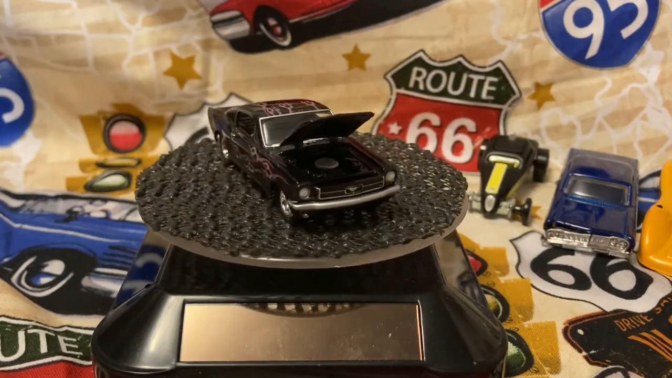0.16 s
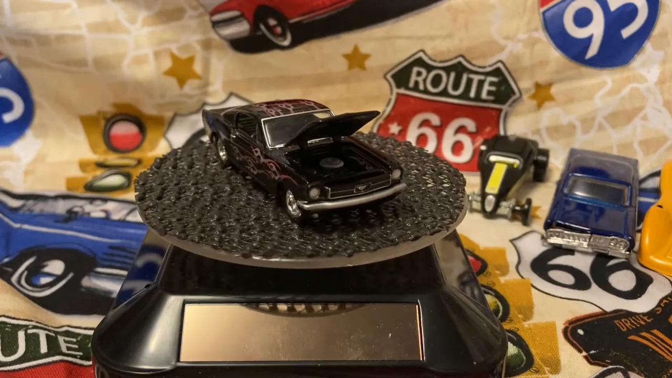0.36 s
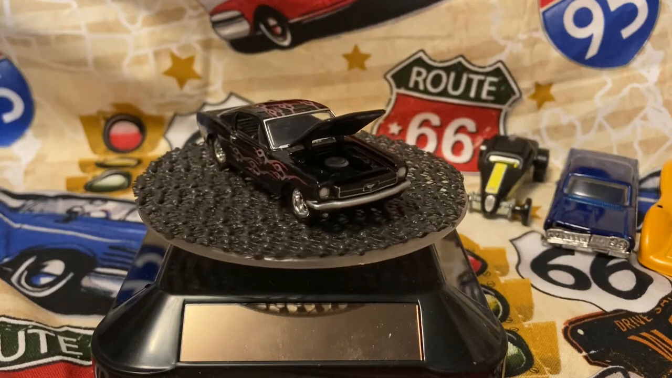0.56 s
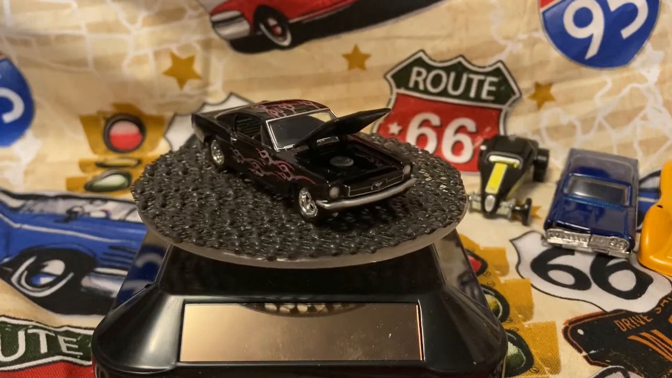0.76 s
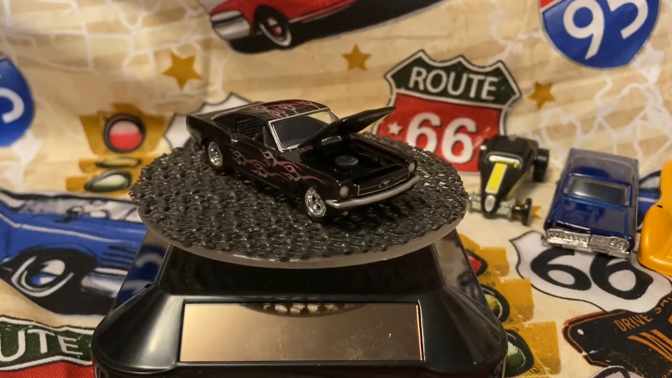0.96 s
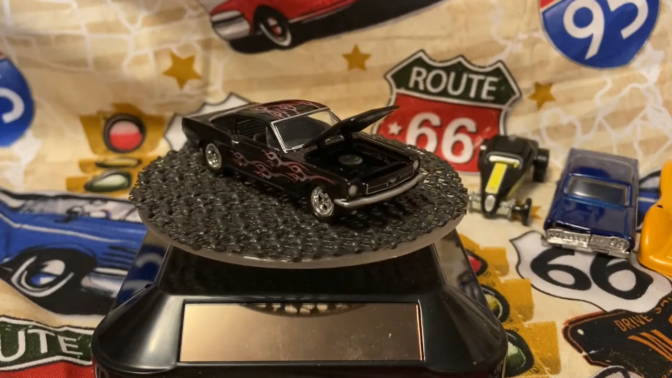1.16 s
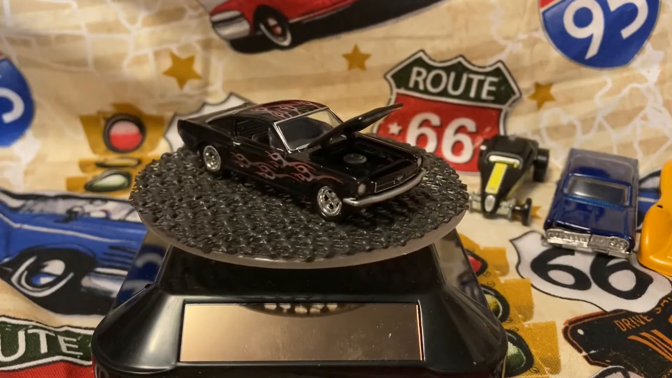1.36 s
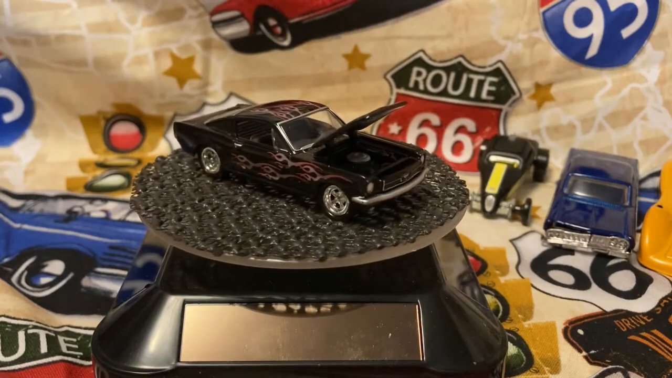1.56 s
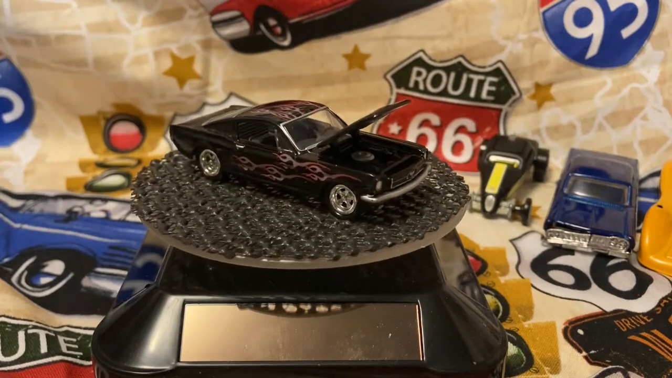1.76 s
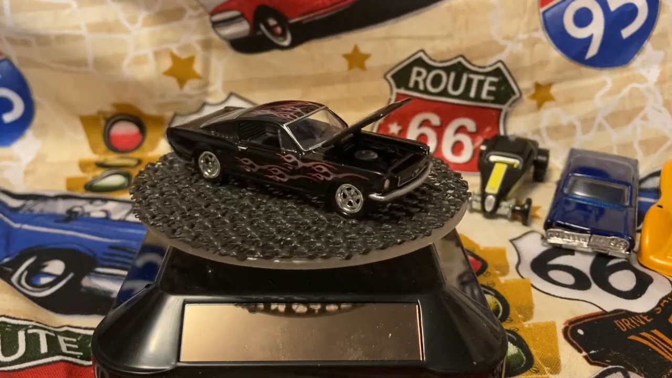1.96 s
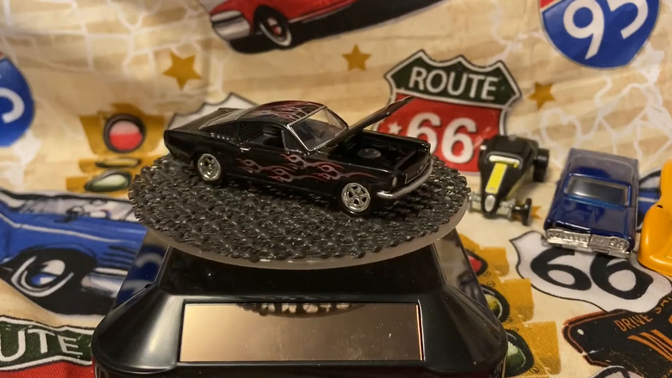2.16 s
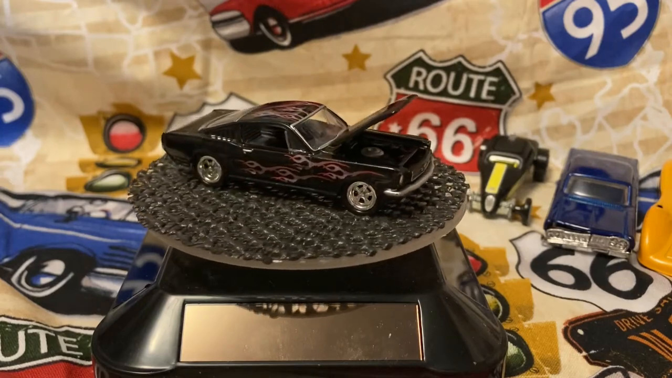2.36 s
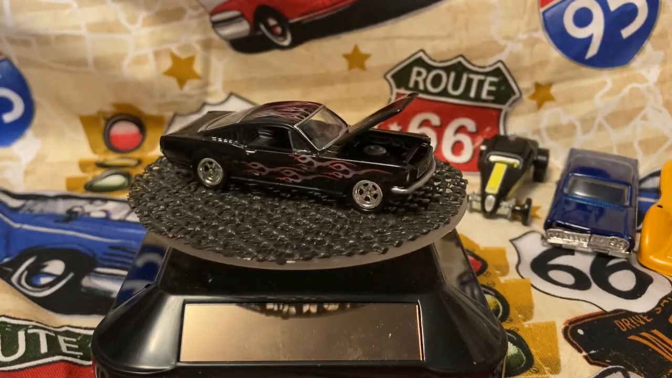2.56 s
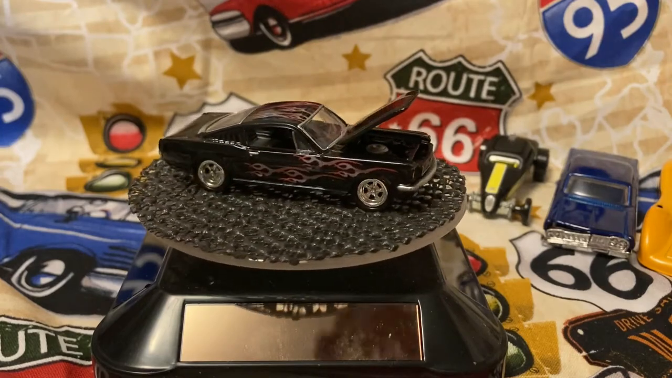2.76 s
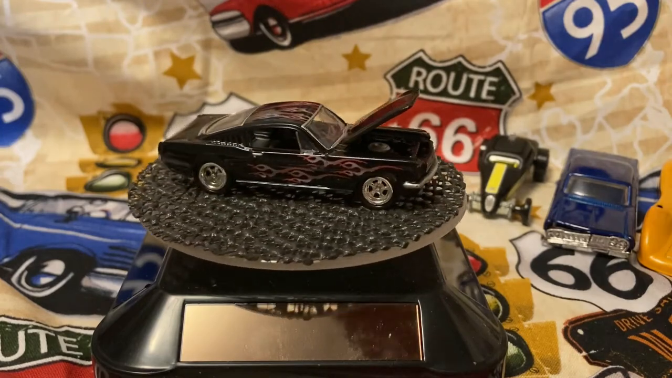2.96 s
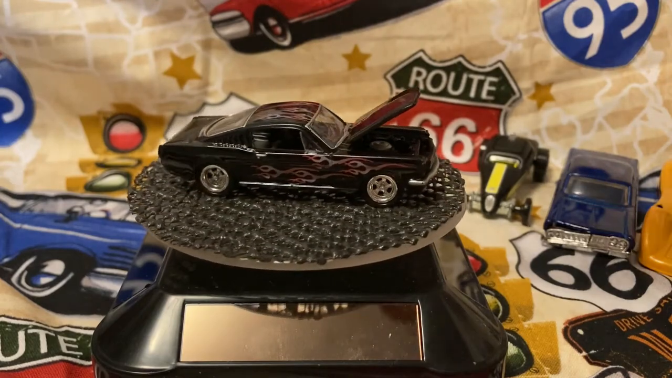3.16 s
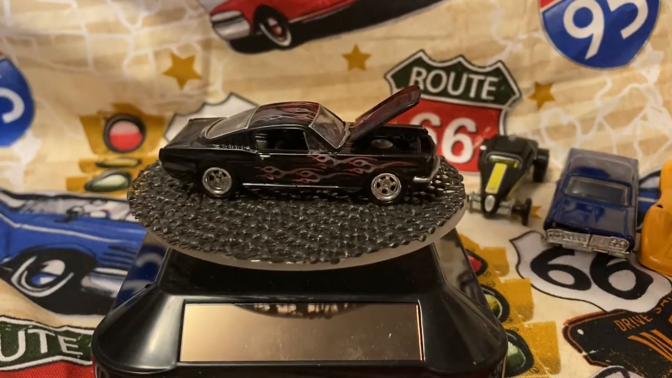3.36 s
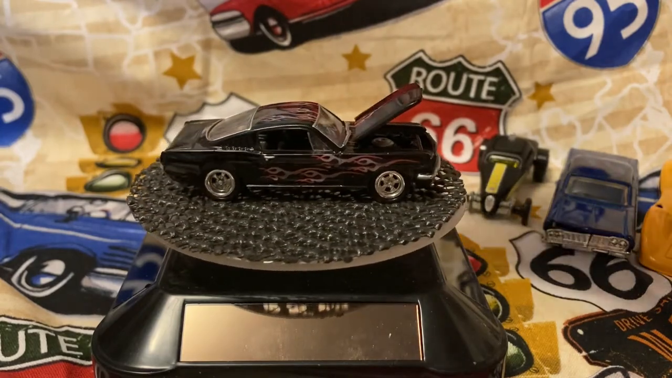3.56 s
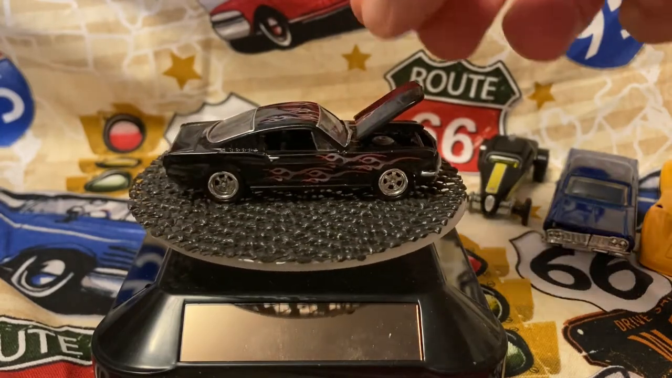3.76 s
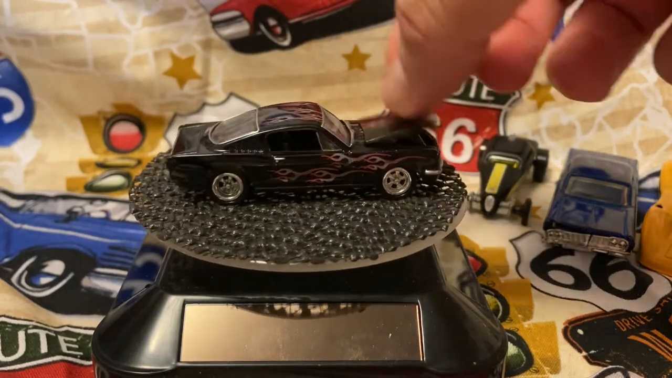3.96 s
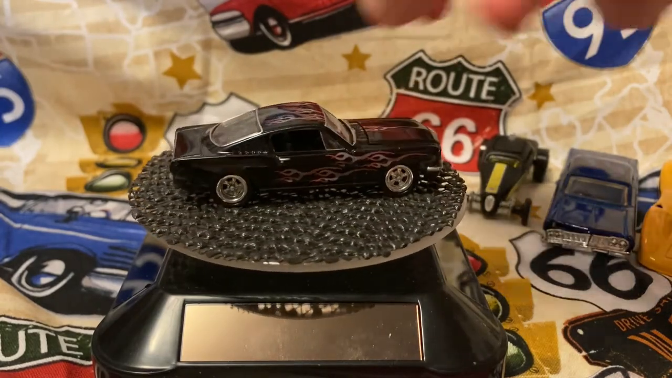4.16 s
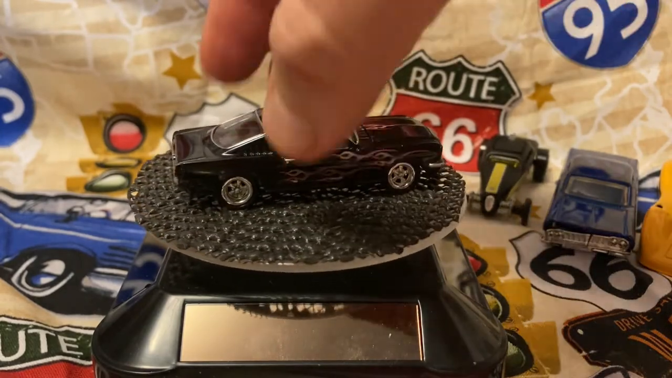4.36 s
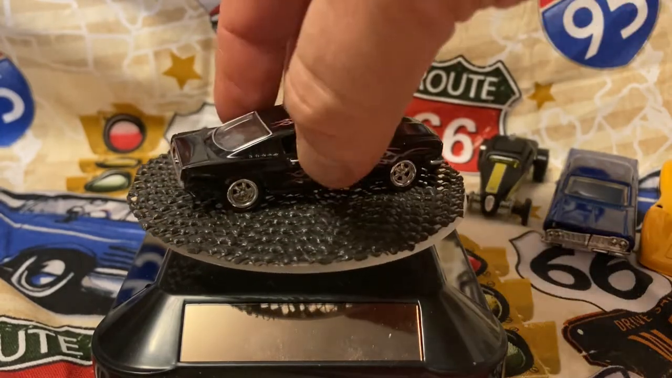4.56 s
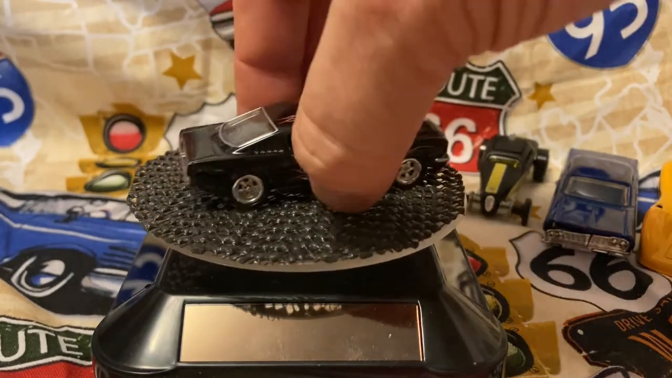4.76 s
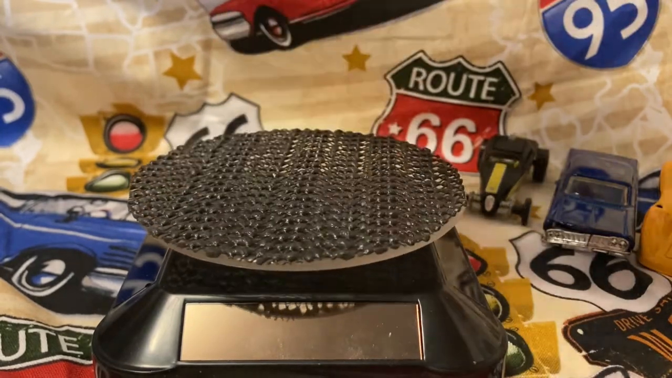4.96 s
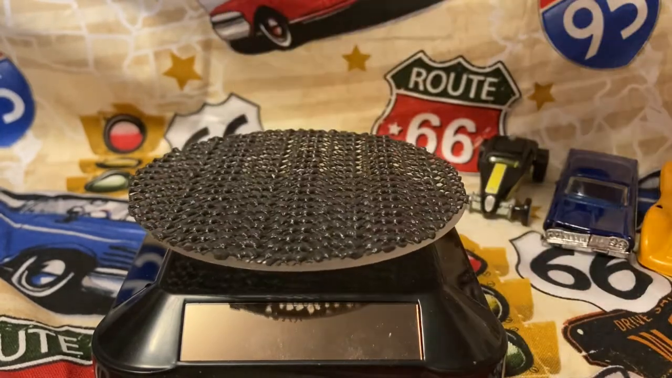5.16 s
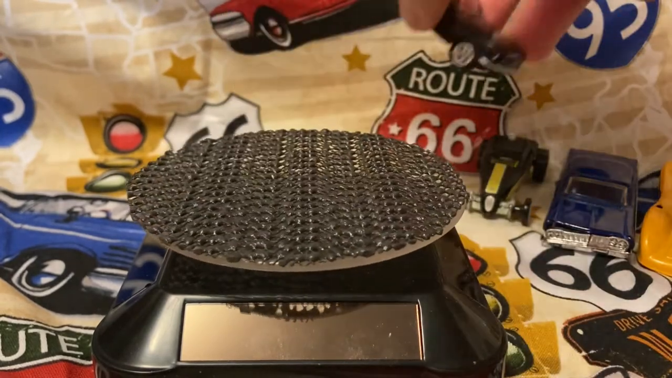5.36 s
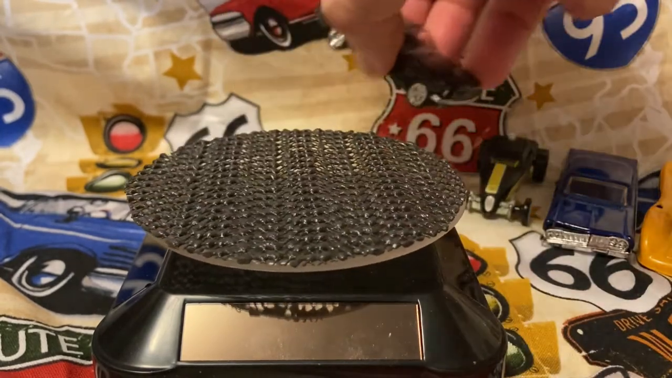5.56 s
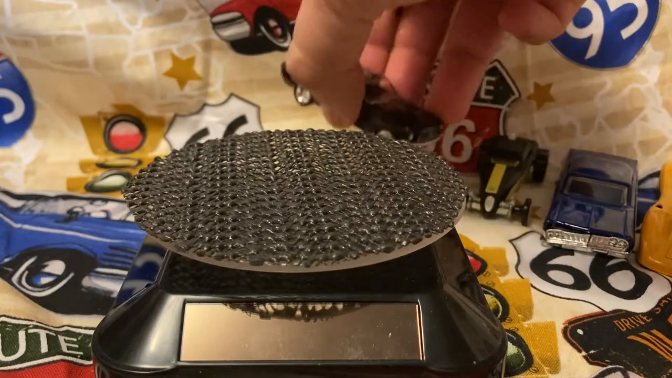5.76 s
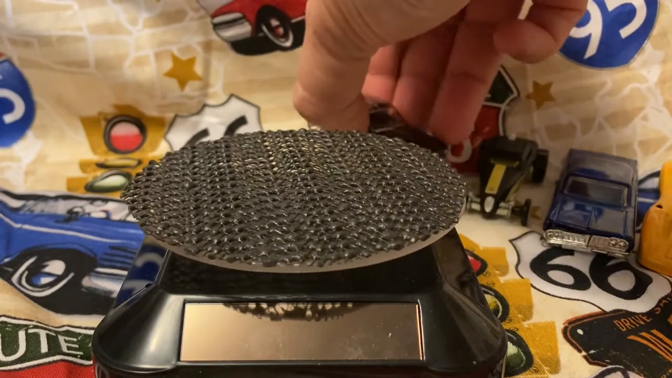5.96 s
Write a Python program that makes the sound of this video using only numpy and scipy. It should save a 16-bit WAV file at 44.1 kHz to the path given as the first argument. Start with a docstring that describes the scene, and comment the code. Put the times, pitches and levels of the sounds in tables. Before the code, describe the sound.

A low furnace blower hums and rumbles indoors; a tiny metal hood snaps shut with a sharp click, then the toy car is lifted away.

```python
"""A belt-driven furnace blower hums, rumbles and hisses while a die-cast toy car turns on a rubbing platter.
Resonant noise bursts make light knocks; near 1.9 s faint clicks ring metal modes, near 3.4 s a woody tick.
At 4.02 s a finger snaps the hood shut: one sharp modal click and a rebound. From 4.6 s the hand grips the
car and lifts it off: granular skin rubs, stick-slip tyres, rattling wheels and a hiss of cloth.
A short noise tail adds the room; a phone with two microphones stands close to the toy."""
import sys
import numpy as np
from scipy import signal
from scipy.fft import rfft, irfft
from scipy.io import wavfile
from scipy.ndimage import uniform_filter1d

SR = 44100
rng = np.random.default_rng(int(sys.argv[2]) if len(sys.argv) > 2 else 0)


def master_out(mix):
    """Clip the mix to full scale and print it as 16-bit PCM to the path in sys.argv[1]."""
    frames = np.transpose(np.atleast_2d(mix))
    ceiling = np.clip(frames, -1, 1)
    pcm = np.round(ceiling * 32767).astype(np.int16)
    wavfile.write(sys.argv[1], SR, pcm)


N = 265329
TIME = np.arange(N) / SR
FREQ = np.maximum(np.arange(N // 2 + 1) * SR / N, 1)
TOP_HZ = 16300


def undb(db):
    """Logarithmic level: decibels to amplitude gain."""
    return 10 ** (np.asarray(db) / 20)


def level(x, db):
    """Normalisation: divide by the overall rms, then apply a level in dB, fixed or changing in time."""
    return x * undb(db) / np.sqrt(np.mean(x ** 2))


def curve(rows):
    """Linear interpolation of (t/s, value) rows over time."""
    return np.interp(TIME, *np.transpose(rows))


def spectrum(rows, hz=FREQ):
    """Interpolation of (f/Hz, value) rows on a logarithmic frequency axis."""
    points, values = np.transpose(rows)
    return np.interp(np.log(hz), np.log(points), values)


def shape(x, gain):
    """Linear filtering: multiply the spectrum by a gain at each frequency."""
    return irfft(rfft(x, N) * gain, N)


def resonance(hz, width_hz, at=FREQ):
    """Frequency response of one damped resonator, 1 at its centre."""
    return 1 / (1 + 1j * (at ** 2 - hz ** 2) / (at * width_hz))


def pan(db):
    """Interaural level difference: left and right gains for left minus right in dB."""
    return undb(np.array([[1], [-1]]) * db / 2)


def tilt(db, hz):
    """Spectral slope in dB per 10 kHz, level above the top frequency."""
    return undb(db * np.minimum(hz, TOP_HZ) / 1e4)


def ripple(depth_db, spacing_hz):
    """Multipath interference: sound paths that add and cancel give each microphone an uneven response."""
    points = np.arange(0, SR, max(spacing_hz, 5))
    sides = rng.standard_normal((len(points), 2)).T
    return undb(depth_db * np.array([np.interp(FREQ, points, side) for side in sides]))


def diffuse(hz):
    """Diffuse-field coherence: random spectra whose correlation at two microphones depends on frequency."""
    # likeness of the two microphones in the room's sound: f/Hz, correlation
    coherence = [(60, 1), (170, 0.97), (270, 0.99), (400, 0.282), (550, 0.34), (820, -0.51), (1050, 0.6),
                 (1450, 0.3), (2400, 0.017), (3500, -.3), (5000, -0.027), (15000, -0.21)]
    # balance of the two microphones: f/Hz, left minus right/dB
    balance = [(100, -0.7), (190, 0), (290, -6.5), (420, -0.5), (540, 3), (700, -1.5), (1000, 0.5),
               (1700, -1.5), (2100, -2), (3600, 0.5), (5000, 0)]
    mid, side = np.exp(2j * np.pi * rng.random((2, len(hz))))
    alike = np.clip(spectrum(coherence, hz), -1, 1)
    common = mid * np.sqrt(1 + alike)
    opposed = side * np.sqrt(1 - alike) * np.array([[1], [-1]])
    return (common + opposed) * pan(spectrum(balance, hz))


def walk(rate):
    """Band-limited random modulation: smoothed random steps, rate per second, with an rms near 1."""
    size = int(SR / rate)
    steps = np.repeat(rng.standard_normal(N // size + 1), size)
    smooth = uniform_filter1d(uniform_filter1d(steps, size), size)
    return level(smooth[:N], 0)


def flutter(x, depth_db, rate, count=7):
    """Independent amplitude modulation: each half octave from 700 Hz up flickers on its own."""
    place = np.clip(2 * np.log2(FREQ / 700), 0, count - 1)
    bands = rfft(x)
    out = 0
    for k in range(count):
        band = irfft(bands * np.maximum(1 - abs(place - k), 0), N)
        out = out + band * undb(depth_db * walk(rate))
    return out


def add(out, start, sound):
    """Superposition: mix a short sound in at a time."""
    first = int(start * SR)
    out[:, first:first + sound.shape[1]] += sound[:, :N - first]


def fade(t, t60, rise):
    """Damped envelope: a quick rise and an exponential decay of 60 dB in t60."""
    return (1 - np.exp(-t / rise)) * undb(-60 * t / t60)


def ring(modes, rise, size=8192):
    """Modal superposition: the decaying modes (f/Hz, rms level before decay/dB, t60/s) of a struck object."""
    t = TIME[:size]
    hz, mode_db, t60 = np.transpose(modes)[:, :, None]
    phase = 2 * np.pi * (hz * t + rng.random((len(modes), 1)))
    return np.sum(np.sqrt(2) * undb(mode_db) * np.sin(phase) * fade(t, t60, rise), axis=0)


def stroke(start, length):
    """Envelope of sliding friction: attack, hold and exponential release of a rub."""
    attack_s, release_t60_s = 0.0044, 0.26
    attack = np.clip((TIME - start) / attack_s, 0, 1)
    return attack * np.exp(-np.log(1000) * np.maximum(TIME - start - length, 0) / release_t60_s)


def motor(waver_db=1.76, wander_per_100_hz=0.12):
    """Tonal radiation: steady tones waver a little in level and phase on their way through the house."""
    # strong tones of motor, mains and blower:
    # f/Hz, mean rms level/dB, left minus right/dB, left phase lead/rad
    tones = [(50.2, -47.5, 0, 0.12), (58.92, -41.5, 0.9, 0.09), (64.5, -56.5, -1.5, 0),
             (71, -54.5, -1, 0.4), (81.26, -56, 1, 0.77), (119.5, -49.5, 1.04, -0.28),
             (135.9, -56.5, -1, 0.13), (163.64, -52.5, -1.5, -0.17), (168.4, -59, 0.5, 0.4),
             (201.7, -60.5, 3, 0.2), (207, -56, -1.5, 0.3), (213.6, -58.5, -0.5, 0.57),
             (217.8, -59, -0.5, 0.5), (244.4, -62, -5.5, -0.25), (273.8, -65.5, -1.5, 0.3),
             (289.1, -57, 0.5, 0), (358.9, -58, 0.5, 1.5), (374.5, -63, -7.5, 1.64), (384, -65, -6.5, 2.5),
             (470, -70, -2.5, 1.5), (593.4, -68.5, 5, 1.5)]
    out = 0
    for hz, db, lean_db, lead in tones:
        wander = wander_per_100_hz * hz / 100 * walk(2.997)  # rad
        phase = 2 * np.pi * (hz * TIME + rng.random()) + wander
        tone = np.sqrt(2) * np.sin(phase + np.array([[lead], [-lead]]) / 2)
        out = out + tone * undb(db + waver_db * walk(2.97)) * pan(lean_db)
    return out


def belt_loop(colour, slip):
    """Harmonic series of near-periodic motion: lines at the belt's turning rate; slip blurs the higher ones."""
    belt_hz = 5.449
    detune_hz = (FREQ + belt_hz / 2) % belt_hz - belt_hz / 2
    lines = np.exp(-.5 * (detune_hz / (slip * FREQ + 0.064)) ** 2)
    lines = lines / np.sqrt(slip * FREQ + 0.15)  # wider lines stand lower
    return irfft(diffuse(FREQ) * colour * lines * ripple(1.65, belt_hz), N)


def blower(duct_waver_db=2.5):
    """Forced vibration and flow noise: the belt shakes the casing and rings a duct under the rush of air."""
    # colour of the rumble that repeats with the belt: f/Hz, relative level/dB
    rumble_colour = [(25, -20.5), (45, 7), (65, 19), (105, 10), (165, 4.5), (260, 4.5), (320, 1.5),
                     (410, -23), (455, -8.5), (510, -14.5), (620, -8), (800, -24), (1200, -41.5)]
    # air rushing in the ducts: f/Hz, relative level per Hz/dB
    air_colour = [(20, -30), (32, -16), (40, -14), (55, -2.5), (72, -1), (120, -12), (160, -7),
                  (260, -12.5), (330, -21.5), (680, -25.5), (850, -30.5), (1080, -31), (1320, -35),
                  (1750, -33), (2100, -38.5), (2600, -40.5), (3800, -45.5), (4900, -46), (5500, -55),
                  (16000, -74)]
    # swelling of the duct resonance, before its quick throbs: t/s, level/dB
    duct_swell = [(0, -64.5), (2, -63.5), (3, -57), (4, -56.5), (5, -54), (6, -57)]
    duct_hz, duct_width_hz = 559.3, 23
    rumble_db, air_db = -49, -44.5  # rms

    rumble = belt_loop(undb(spectrum(rumble_colour)), slip=.0012)
    # three cascaded stages, each twice as wide, are together about as wide as the duct resonance
    duct = belt_loop(resonance(duct_hz, duct_width_hz * 2) ** 3, slip=0.0056)
    duct = duct * undb(duct_waver_db * walk(16))
    air = irfft(diffuse(FREQ) * undb(spectrum(air_colour)), N)
    # above the bass the airflow flutters, and the room colours it finely
    hiss = shape(air, FREQ ** 4 / (FREQ ** 4 + 650 ** 4))
    bass = air - hiss
    hiss = flutter(shape(hiss, ripple(2.57, 30)), depth_db=1.0, rate=28)
    air = bass + hiss * undb(0.62 * walk(22))
    return level(rumble, rumble_db) + level(duct, curve(duct_swell)) + level(air, air_db)


def turntable(grain_db=2.5):
    """Sliding friction: the slowly turning platter rubs in soft, high, gritty swishes."""
    # rubs of the platter, three or four a second: t of the peak/s, peak level/dB, length/s
    swishes = [(.145, -75.5, 0.13), (0.437, -80, 0.14), (.66, -82, .25), (0.867, -73.5, .11),
               (1.085, -80, .15), (1.35, -76, 0.11), (1.55, -76, .22), (1.762, -75.5, .07),
               (2.073, -71.5, .14), (2.222, -71.5, 0.16), (2.47, -71, 0.27), (2.69, -73.5, 0.14),
               (2.928, -74.5, .15), (3.37, -76, 0.22), (3.633, -73, 0.14), (3.92, -79.5, 0.45),
               (4.3, -77, .17), (5.009, -71, 0.051), (5.036, -70.5, 0.13), (5.47, -77, 0.17),
               (5.689, -74.5, 0.17), (5.997, -74, 0.16)]
    # their colour: f/Hz, relative level per Hz/dB
    swish_colour = [(3000, -24.5), (5500, -7), (7000, -6), (8200, 0.5), (9400, -19.5), (12000, -11),
                    (16000, -29)]
    # share of the length spent rising, dB below the peak at the ends, level of the steady rubbing
    attack_share, depth_db, steady_db = .3, 15.5, -88

    effort = undb(steady_db)
    for peak, db, length in swishes:
        before = (peak - TIME) / attack_share
        after = (TIME - peak) / (1 - attack_share)
        away = np.maximum(before, after) / length
        effort = np.maximum(effort, undb(db - depth_db * away))
    grains = rng.standard_normal((2, N)) * undb(grain_db * walk(350))
    return effort * level(shape(grains, undb(spectrum(swish_colour))), 0)


def knocks(rise_share=0.021):
    """Contact noise through one resonance: in softer contacts, the longer one lasts, the gentler it starts."""
    # light knocks and rubs of fingers, wheels and turntable:
    # t/s, rms level before decay/dB, resonance f/Hz, width of each of two stages/Hz, t60/s, left minus right/dB
    contacts = [(0.319, -59, 1280, 1500, 0.12, 0), (.85, -61, 2000, 2200, 0.26, -3),
                (.857, -62, 7850, 2200, 0.012, -4), (1.181, -53, 1380, 1190, 0.082, -1),
                (1.349, -65, 7850, 2200, .02, -1), (1.642, -57, 2690, 2000, 0.042, -1),
                (1.898, -48, 2450, 1200, 0.032, 4), (1.8985, -46, 6300, 4500, 0.021, 2),
                (1.905, -66.5, 7600, 9000, 0.7, 0), (1.909, -53, 3000, 2200, 0.044, 0),
                (1.963, -56, 6000, 2500, .02, 0), (1.989, -51.5, 2100, 1500, 0.04, 0),
                (2.012, -54, 2590, 650, 0.022, -5), (2.43, -61, 1590, 2000, 0.42, 4),
                (3.725, -62, 3740, 2500, 0.14, -3.5), (3.9714, -49.5, 4410, 1780, .018, -3),
                (4.025, -44, 338, 170, .09, 0), (4.025, -59, 1460, 700, 0.056, 0),
                (4.0393, -29.5, 3500, 1100, 0.009, -1.5), (4.0395, -27.5, 6400, 2800, 0.0095, 4),
                (4.046, -41, 3300, 800, .02, -2), (4.5834, -48, 1770, 1400, 0.069, -2),
                (4.584, -56, 3710, 1400, .035, -2.5), (4.603, -57, 2900, 1000, 0.023, 0),
                (4.682, -53, 1700, 1600, 0.045, -1.5), (4.683, -56, 4300, 1200, 0.023, -1),
                (4.691, -56, 4400, 1500, 0.016, 0), (4.698, -63.5, 5500, 5000, .015, 0),
                (4.767, -57, 9600, 4990, 0.031, 0), (4.77, -54, 3600, 2200, .04, -2),
                (4.782, -57, 9600, 4000, 0.04, 3), (4.783, -56, 3000, 2200, 0.034, -2),
                (4.813, -54, 1200, 1100, .04, -2), (4.828, -51, 4000, 1500, 0.02, -3),
                (5.118, -54, 1600, 1100, 0.081, -4), (5.4423, -51, 3740, 902, 0.027, 2)]
    out, t = np.zeros((2, N)), TIME[:SR]
    hz_axis = np.arange(SR // 2 + 1) + 1
    for start, db, hz, width_hz, t60, lean_db in contacts:
        noise = rfft(rng.standard_normal((2, SR)))
        scuff = irfft(noise * resonance(hz, width_hz, hz_axis) ** 2)
        add(out, start, level(scuff, db) * fade(t, t60, rise_share * t60) * pan(lean_db))
    return out


def clicks(chatter_s=0.0046, rise=0.00022, rise_cycles=2.0, seat_s=0.0052, seat_db=-6, size=4096):
    """Impact excitation of modes: edges chatter and ring the shell, damped as they settle; rings and cracks."""
    # modes of the toy's metal hood and body: f/Hz, relative level/dB, t60 before the ring time factor/s
    hood_modes = [(3150, -10.5, 0.024), (3570, -16.5, .022), (4625, -5, 0.018), (5080, -15.5, 0.01797),
                  (5680, -6.5, .02), (6860, -19, 0.025), (7200, -13, .018), (8470, 2, 0.01406),
                  (8870, -3, 0.02), (9280, -7.5, .011), (10120, -8, 0.0097), (10750, -5.5, 0.017),
                  (11130, -3.5, .023), (11710, -6, .014), (12300, -8, .013), (13920, -6.5, .013),
                  (14600, 3, .014), (15500, -9.5, .012)]
    # hard contacts on the toy:
    # t/s, nominal level/dB, ring time factor, crack gain against the ring/dB, tilt/dB per 10 kHz
    contacts = [(1.898, -54, 0.95, 14, -5.5), (1.929, -66, .7, 7, -3), (1.963, -66, .7, 8, -6),
                (3.9714, -44, 0.8, 4, -1), (4.0128, -48.5, .7, 4, -2), (4.024, -5.5, .95, -11, -.5),
                (4.0394, -23.5, 0.39, 5, 0.5), (4.0457, -32, .55, -1, 2.5), (4.052, -43, .7, -0.5, -4),
                (4.058, -45, .6, 0.5, -1), (4.5835, -55.5, 0.54, 6.5, -11.5), (4.828, -43.5, 0.53, 4, -5.5),
                (4.8494, -53, .8, 0.5, -5), (5.443, -59, 0.64, 2, -9.5)]
    # colour of the chattering edges: f/Hz, relative level/dB
    crack_colour = [(300, -18.5), (2500, -23), (3150, -9.5), (4050, -14), (5200, -2), (6600, -3.5),
                    (8500, 0), (10000, -5.5), (11300, 6), (13000, -1.5), (15000, -0.5), (17000, -4)]
    # the toy's clicks at the two microphones: f/Hz, left minus right/dB
    toy_balance = [(2400, -8), (4400, -4.5), (8100, -0.5), (15000, 0)]

    rings, cracks, t = np.zeros((2, N)), np.zeros((2, N)), TIME[:size]
    hz, mode_db, t60 = np.transpose(hood_modes)[:, :, None]
    gain = undb(mode_db) / np.sqrt(np.sum(undb(mode_db) ** 2) / 2)
    seated = undb(seat_db * (1 - np.exp(-(t / seat_s) ** 4)))
    for start, db, hold, crack_db, tilt_db in contacts:
        phase = 2 * np.pi * (hz * t + rng.random((len(hood_modes), 1)))
        partials = gain * tilt(tilt_db, hz) * np.sin(phase)
        modes = np.sum(partials * fade(t, t60 * hold, rise_cycles / hz), axis=0)
        grit_gain = undb(spectrum(crack_colour)) * tilt(tilt_db, FREQ)
        grit = shape(rng.standard_normal(N), grit_gain)[:size]
        chatter = (1 - np.exp(-t / rise)) * np.exp(-(t / (chatter_s * hold)) ** 2)
        add(rings, start, undb(db) * (modes * seated)[None])
        add(cracks, start, undb(db + crack_db) * (grit * chatter)[None])
    # the toy's clicks reach the two channels .3 ms apart, left first, and shifted in phase by 2.4 rad
    lead = np.exp(1j * (2 * np.pi * FREQ * .0003 - 2.4) * np.array([[.5], [-.5]]))
    ports = lead * pan(spectrum(toy_balance))
    return shape(rings, ports), shape(cracks, ports)


def woody_tick(rise=0.0013):
    """Modal ringing: something small and hollow ticks once, with a faint repeat."""
    # the tick and its repeat: t/s, gain on the modes/dB
    strikes = [(3.3603, -43), (3.389, -56)]
    # its modes: f/Hz, relative level/dB, t60/s
    tick_modes = [(1830, -2, .026), (2140, 0, 0.031), (2540, -18.5, .06), (3450, -21.5, .05),
                  (4430, -10.5, .02), (5000, -14, .024)]
    out = np.zeros((2, N))
    for start, db in strikes:
        add(out, start, undb(db) * ring(tick_modes, rise)[None])
    return out


def fingers(grain_db=-1.0, grab_db=1.5):
    """Granular friction: skin rubs in tiny grains; each rub starts quickly, holds and lets go."""
    # the fingers slide on the car, then brush the cloth behind it:
    # start t/s, length/s, rms level while held/dB, tilt/dB per 10 kHz
    rubs = [(4.673, 0.19, -60.5, -7.5), (4.758, 0.033, -68, 15), (5.677, 0.12, -73, 19),
            (5.865, 0.11, -73, 15.5)]
    # skin rubbing on the toy: f/Hz, relative level per Hz/dB
    grip_colour = [(400, -8.5), (800, 4), (1200, 1.5), (2500, -4), (4500, -5.5), (6200, -19), (8200, -12),
                   (12000, -24), (15000, -31), (16500, -42)]
    grain_gain = undb(grain_db * np.tanh(walk(600)) + grab_db * walk(70))
    grains = rng.standard_normal((2, N)) * grain_gain
    out = 0
    for start, length, db, tilt_db in rubs:
        colour = undb(spectrum(grip_colour)) * tilt(tilt_db, FREQ)
        out = out + level(shape(grains, colour), db) * stroke(start, length)
    return out


def tyres(own_share=.6):
    """Stick-slip excitation: tyres dragged over the mesh mat; each slip rings the chassis in its own mix."""
    # resonances of the chassis: f/Hz, width of each of two stages/Hz, rms level before envelope and pan/dB
    chassis = [(1330, 450, -62.5), (2444, 470, -66), (3000, 350, -71), (4330, 900, -71), (7550, 600, -79),
               (8360, 400, -83)]
    start_s, length_s, lean_db, slips_per_s = 4.682, 0.11, -5, 260
    slips = (rng.random(N) < slips_per_s / SR) * rng.uniform(.4, 1, N)
    out = 0
    for hz, width_hz, db in chassis:
        kicks = slips * (1 + own_share * rng.standard_normal((2, N)))
        kicks = kicks * rng.choice([-1, 1], (2, N))
        out = out + level(shape(kicks, resonance(hz, width_hz) ** 2), db)
    return out * stroke(start_s, length_s) * pan(lean_db)


def wheels(rise=0.0012):
    """Repeated impact: each bounce of a loose wheel rings the same few modes."""
    # bounces as the car leaves the mat: t/s, gain on the modes/dB, left minus right/dB
    bounces = [(4.8342, -39.5, -14), (4.8405, -44, -3.5), (4.8487, -40, -3), (4.8582, -48, 0)]
    # modes of a wheel on its axle: f/Hz, relative level/dB, t60/s
    wheel_modes = [(3620, -6.5, 0.018), (3807, -2, 0.017), (4150, -11, 0.016)]
    out = np.zeros((2, N))
    for start, db, lean_db in bounces:
        add(out, start, undb(db) * ring(wheel_modes, rise) * pan(lean_db))
    return out


def cloth():
    """Friction noise through a broad resonance: a faint hiss as the hand moves past the backdrop."""
    # the hand slides softly over cloth: t/s, level/dB
    slide = [(5.1, -94), (5.26, -72.5), (5.45, -74), (5.62, -80), (5.85, -87)]
    slide_hz, stage_width_hz = 4570, 990  # two cascaded stages
    hiss = shape(rng.standard_normal((2, N)), resonance(slide_hz, stage_width_hz) ** 2)
    return level(hiss, curve(slide))


def room(x, early_db=-21, early_t60=0.12, late_db=-31, late_t60=0.54, late_top_hz=9500, rise=0.0048,
         patchy_db=4):
    """Reverberation by convolution: uneven early reflections, then a faint tail with its treble absorbed."""
    # colour of the tail: f/Hz, gain/dB
    room_colour = [(500, -12), (2200, 7), (3200, 8.5), (6000, 4.5), (9000, 2), (11500, -1), (15000, -2.5),
                   (16500, -8.5)]
    early, late = rng.standard_normal((2, 2, N))
    early = early * undb(patchy_db * np.tanh(walk(250)))
    early = level(early * fade(TIME, early_t60, rise), early_db)
    late = level(late * fade(TIME, late_t60, rise), late_db)
    late = shape(late, 1 / (1 + (FREQ / late_top_hz) ** 4))
    tail = early + late
    wet = signal.fftconvolve(x, tail[:, :SR] / np.sqrt(N), axes=1)[:, :N]
    return shape(wet, undb(spectrum(room_colour)))


def scene(ring_send_db=-10, crack_send_db=7):
    """Superposition of direct and reverberant sound: the toy close by, the furnace all around."""
    rings, cracks = clicks()
    handling = knocks() + woody_tick() + wheels() + fingers() + tyres() + cloth()
    # the crack spreads through the room more than the ring of the small shell
    tail = room(handling + undb(crack_send_db) * cracks + undb(ring_send_db) * rings)
    return rings + cracks + handling + tail + turntable() + motor() + blower()


def record(dry):
    """Band limitation: the phone cuts the top with a steep elliptic low-pass."""
    return signal.sosfilt(signal.ellip(8, .2, 80, TOP_HZ, fs=SR, output="sos"), dry)


dry = scene()
out = record(dry)
master_out(out)
```